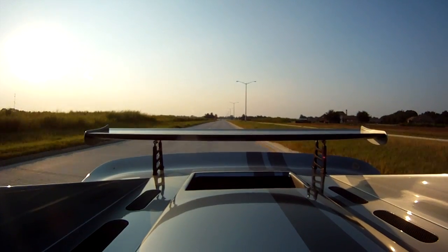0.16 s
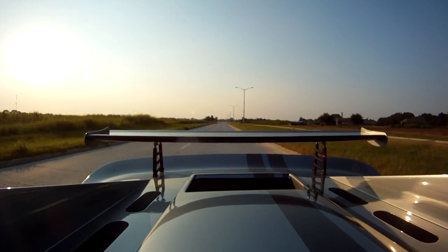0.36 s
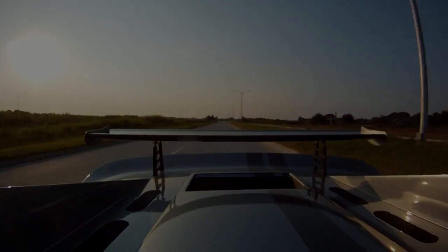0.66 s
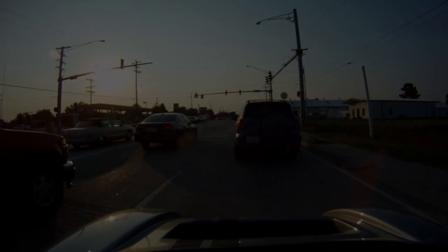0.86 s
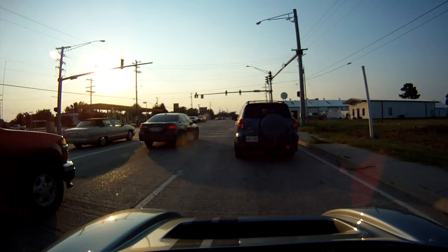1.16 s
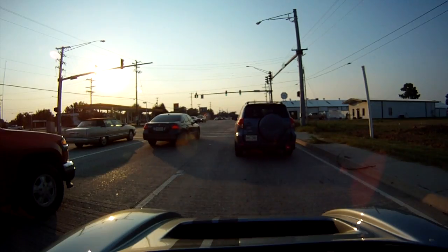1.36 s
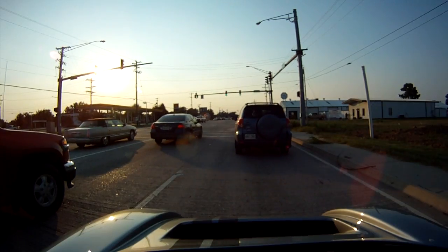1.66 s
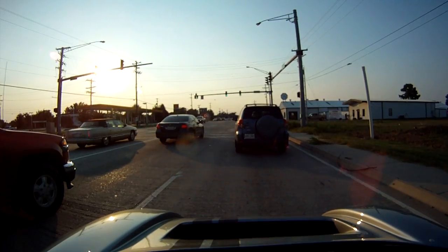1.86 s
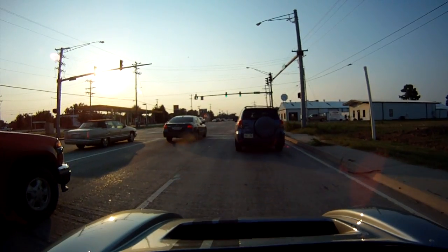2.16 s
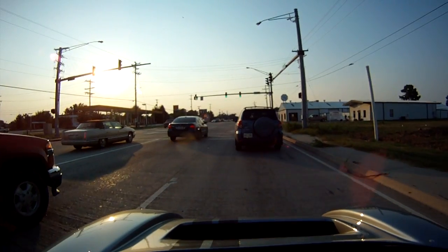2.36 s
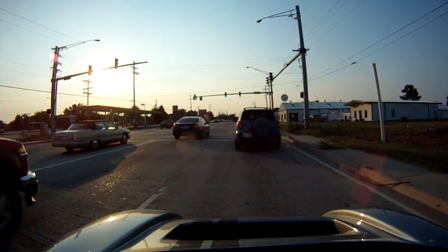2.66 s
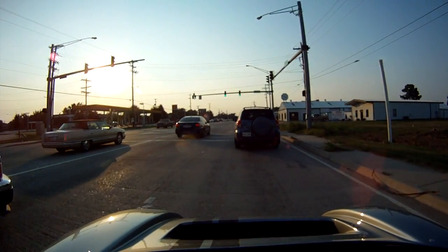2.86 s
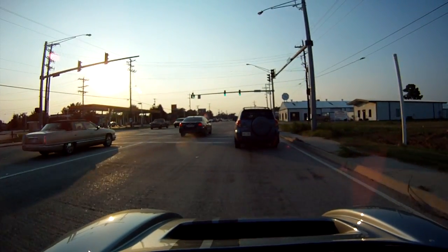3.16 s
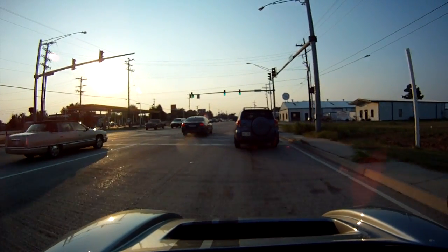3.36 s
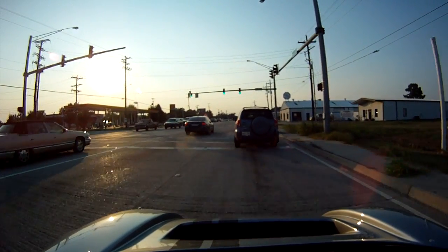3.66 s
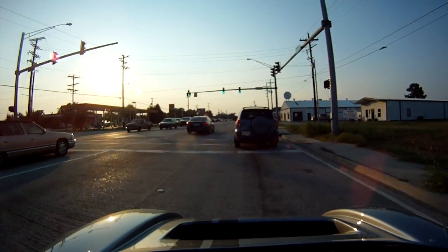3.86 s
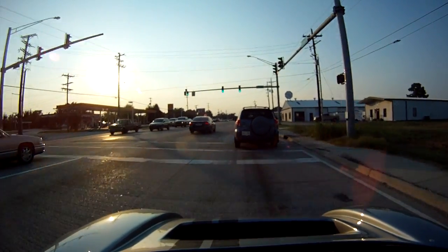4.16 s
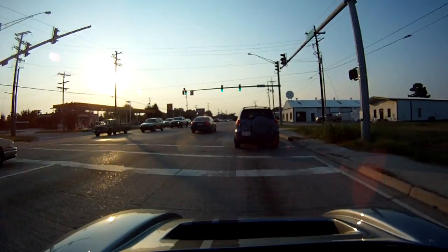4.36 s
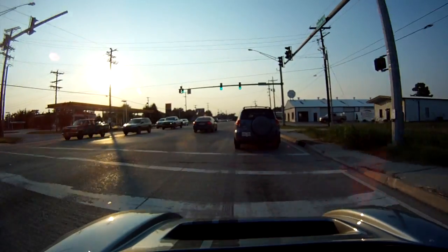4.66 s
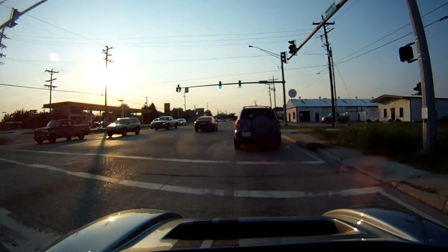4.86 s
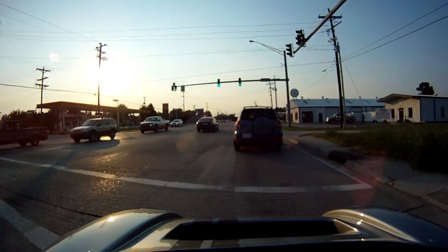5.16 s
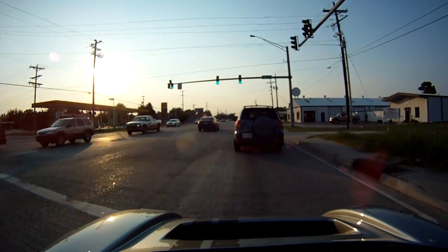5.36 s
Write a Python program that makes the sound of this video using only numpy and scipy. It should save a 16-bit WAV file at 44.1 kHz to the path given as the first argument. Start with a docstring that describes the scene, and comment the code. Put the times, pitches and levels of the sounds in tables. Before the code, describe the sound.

A roaring highway drive heard outside the car, then a sudden cut to soft idling at a junction, revving up and driving off.

```python
"""A roar of wind with slaps and a fast engine: a car cruises with a small housed camera on its tail.
After a hard cut the camera is on the nose: the car idles at a crossing, blips the throttle and pulls away.
The engine is sines on crank orders (cycles per crank turn), coloured by the panel and the bodywork.
Wind, slaps, hiss and tyres are shaped noise; bumps and gusts are short sine booms.
A chain of filters is the housing; the camera samples slowly and holds each sample."""
import sys
import numpy as np
from scipy import signal
from scipy.fft import rfft, irfft
from scipy.io import wavfile

SR = 44100
rng = np.random.default_rng(int(sys.argv[2]) if len(sys.argv) > 2 else 0)


def dump_mix(stems):
    """Bounce the given channels to the path in sys.argv[1] as a 16-bit WAV at rate SR."""
    frames = np.atleast_2d(stems).T  # one column per channel
    limited = np.clip(frames, -1, 1)  # hard clip at full scale
    pcm = np.round(limited * 32767).astype(np.int16)
    wavfile.write(sys.argv[1], SR, pcm)


N = 243431   # length in samples

# All levels are set ahead of the housing and the camera. Noise colours set only the balance of pitches.
CUT_S = .8275   # cruise ends, crossing begins

# Colour of the wind rush while cruising: pitch_hz, level_db (per Hz)
WIND = [(240, -34), (400, -10), (748, -11), (1050, -6), (1660, -7), (2190, -3.5), (5190, -18),
        (5800, -20.5), (7540, -38), (12800, -120)]
# Colour of the air rush at the crossing: pitch_hz, level_db (per Hz)
STREET = [(240, -1), (400, 1), (640, -3), (1010, -4.5), (1660, -11), (2170, 1.5), (3170, -5), (5800, -36.5),
          (7540, -61), (12800, -120)]
# Colour of the low wind buffeting while cruising: pitch_hz, level_db (per Hz)
BUFFET = [(12, -36), (20, 6.5), (54, -3.5), (125, -1), (231, -1.5), (290, -8), (600, -24.5), (780, -20),
          (1320, -120)]
# Colour of the low road rumble at the crossing: pitch_hz, level_db (per Hz)
ROAD = [(12, -47), (20, -0.5), (114, -0.5), (141, -13.5), (192, -17.5), (312, -20), (365, -21),
        (600, -35.5), (780, -30), (1320, -120)]
# Rush of air after the cut, a stand-in for road speed: time_s, level_db
AIR_RUSH = [(0.84, -56), (1.14, -54.5), (1.4, -57.5), (1.88, -49.5), (2.57, -52), (2.95, -48),
            (4.17, -42.5), (4.3, -44), (4.4, -41), (5.15, -41), (5.52, -38)]
# Moments when the rush puffs up or drops: centre_s, change_db, length_s (centre to 1/e)
GUSTS = [(0, 0.5, 0.021), (0.136, 1.5, 0.034), (0.346, -2, 0.035), (0.443, 1, .04), (5.241, 6, 0.032),
         (5.28, -8, 0.0079), (5.323, 5.5, 0.011), (5.52, 3.5, .04)]
CRUISE_RUSH_DB, CRUISE_BUFFET_DB, CRUISE_SHAKE_DB = -17, -18.5, -30

STANDING_DB = -54   # rush of the standing car
# After the cut: level at standing rush (dB), and dB added for each dB the rush grows
RUMBLE_DB, RUMBLE_FOLLOWS = -37, 0.45
SHAKE_DB, SHAKE_FOLLOWS = -40, 0.78
BAY_DB, BAY_FOLLOWS = -59, 0.62

CRUISE_HZ, CRUISE_LOAD_DB = 177.15, 6   # sixth crank order and engine load while cruising
TAIL_FIRING_DB = 9.5   # on the tail the exhaust lifts the sixth order
# Engine at the crossing, sixth crank order: time_s, pitch_hz, load_db
ENGINE = [(.82, 119, -18), (1.5, 120.1, -24), (1.65, 124.1, -12), (1.78, 138, 0.5), (1.95, 161.7, 0),
          (2.1, 178, 0.5), (2.2, 177.6, 2.5), (2.35, 170, -4), (2.55, 143, -7.5), (2.68, 127, 2.5),
          (2.88, 107, 2.5), (2.97, 117, 9), (3.05, 132, 1), (3.2, 137, 1), (3.33, 156, -0.5),
          (3.5, 165, -2.5), (3.75, 188.7, 0.5), (4.1, 215, -2.5), (4.42, 236, -7), (4.76, 251.4, -0.5),
          (5.1, 273, 6.5), (5.52, 292.7, -8)]
# Crank orders: order (cycles per turn), panel_db, body_db (into the body modes), follows (share of load)
ORDERS = [(1.5, -53, -31, 0.84), (2, -42, -28.5, 0.63), (2.5, -62, -36, 0.66), (3, -40, -20.5, 0.94),
          (4, -51, -33, 0.5), (4.5, -66, -35, 1), (5, -60, -42, 1.3), (6, -36, -38, 0.11),
          (7.5, -46.5, -59, 0.91), (8, -53, -33, 0.24), (9, -45, -48, 0.86), (10.5, -53.5, -41.5, 0.17),
          (12, -54.5, -42.5, 0.26), (14, -50.5, -49.5, 0.24), (15, -52, -58, 1.2), (17, -60, -53, 0.66),
          (18, -61, -52, 0.45), (19, -58, -58, 0.42)]
# How the panel passes the crank orders: pitch_hz, level_db
PANEL = [(20, -12), (45, -7), (88, 0), (120, 2), (150, 0), (178, -0.5), (205, -11), (222, -8), (245, -7),
         (268, -4.5), (288, 2.5), (310, -0.5), (338, 1.5), (365, -9.5), (420, -7.5), (510, -5.5),
         (560, -15), (800, -62)]
# Modes of the bodywork, the pitches where it rings: pitch_hz, width_hz, level_db
BODY = [(66, 9.5, -2), (119.94, 6.8, 1), (239.5, 20.2, -2.5), (312.6, 15, -8), (496.4, 37, -8)]
ROAD_SHAKE_HZ = 39.8   # the road shakes less above this
# Booms of the bodywork over bumps and in gusts: centre_s, pitch_hz, level_db (rms), length_s (centre to 1/e)
BOOMS = [(.07, 238, -22, 0.042), (0.283, 237, -21, 0.055), (0.167, 60.5, -19, 0.068),
         (0.5, 102, -20, 0.052), (0.575, 98, -19.5, 0.061), (0.74, 60, -21, 0.075), (0.787, 101, -27, 0.02),
         (1.1, 75, -57, 0.11), (1.715, 118, -39, 0.044), (2.466, 113, -32, 0.09),
         (2.772, 116, -31.5, 0.076), (3.304, 112, -27.5, 0.18), (3.59, 103, -28.5, 0.053),
         (3.803, 71, -21.5, 0.06), (4.146, 65, -20, 0.044), (4.38, 66, -29.5, 0.14),
         (4.624, 71, -28, 0.088), (4.83, 61, -28, 0.063), (5.09, 62, -26, 0.14), (5.22, 107, -33, 0.046),
         (5.414, 66, -20, 0.067)]

# Wind slaps on the housing: start_s, level_db (at the peak), rise_ms (start to peak)
SLAPS = [(0.043, -16.5, 4.1), (0.1587, -15, 6.7), (0.298, -9.5, 3.6), (0.458, -15, 4.9), (0.5748, -7, 1.5),
         (0.602, -19, 3.7)]
# Colour of a slap: pitch_hz, level_db (per Hz)
THUD = [(500, -14), (2300, 0.5), (4500, -12)]

# Steady tone that dies as the car moves off: time_s, pitch_hz, level_db
IDLE_TONE = [(.82, 340, -72), (.84, 323.6, -52.5), (1.5, 316.7, -54.5), (2.0, 302.3, -50),
             (2.4, 320.4, -62), (2.8, 318, -49), (3.2, 316.6, -72)]
# Colour of the engine bay hiss: pitch_hz, level_db (per Hz)
BAY = [(400, -20), (800, 1), (2000, -12.5), (3000, 2.5), (4000, 1.5), (5000, -3.5), (6500, -10)]
# Swells of the engine bay hiss: centre_s, change_db, length_s (centre to 1/e)
SWELLS = [(0.837, 8.5, 0.076), (1.114, 8, 0.083), (1.69, 5.5, 0.044), (2.333, 5, 0.17), (2.947, 5.5, 0.11),
          (3.567, 5.5, .08), (5.5, 0, .05)]
# Tyre roar after the cut: time_s, level_db
TYRES = [(.84, -68), (2.6, -76), (3.2, -62), (3.8, -57), (4.8, -47.5), (5.52, -46.5)]
# Colour of the tyre roar: pitch_hz, level_db (per Hz)
TREAD = [(550, -26), (750, -1), (1100, 5.5), (1500, -8.5), (2000, -32)]
# Hum that rises more slowly than the engine: time_s, pitch_hz, level_db
RISING_HUM = [(3.3, 116.4, -71), (3.6, 125.5, -44), (4.0, 137, -36), (4.5, 148, -40), (5.1, 160.8, -38),
              (5.52, 172, -37.5)]

# Peaks and dips of the housing on the tail: pitch_hz, width_hz, level_db
TAIL_MOUNT = [(1054, 146, 8), (1303, 58, -7), (1470, 220, 5.5), (1600, 95, -6), (2273, 220, 7.5),
              (2790, 270, 3.5), (3990, 160, 4), (4340, 470, -4.5), (4710, 170, 6.5), (5216, 100, 7)]
# Peaks and dips of the housing on the nose: pitch_hz, width_hz, level_db
NOSE_MOUNT = [(754, 30, 2.5), (997, 41, 7), (1260, 84, -3.5), (1437, 180, 8.5), (1655, 150, -3),
              (2138, 50, 7.5), (2450, 57, -10.5), (2790, 117, 6.5), (3145, 300, -10), (3580, 410, -7.5),
              (3994, 76, 4), (4360, 480, -8.5), (4620, 150, 0.5)]
ALIAS_GUARD_HZ, CUTOFF_HZ = 5710, 15200   # treble limits before sampling and at the output


def from_db(db):
    """Turn decibels into gain."""
    return 10 ** (np.asarray(db) / 20)


def rms_one(x):
    """Scale a sound to an rms level of 1."""
    return x / np.sqrt(np.mean(x ** 2) + 1e-20)


def in_time(rows):
    """Draw straight lines between the rows of a table, one curve for each column after the time."""
    times_s, *columns = np.transpose(rows)
    return np.array([np.interp(np.arange(N) / SR, times_s, column) for column in columns])


def cut(cruise, street):
    """Take the cruise before the cut and the crossing after it."""
    return np.where(np.arange(N) / SR < CUT_S, cruise, street)


def at_hz(points, hz):
    """Read a colour at any pitch, along a log pitch axis."""
    point_hz, point_db = np.array(points).T
    return np.interp(np.log(hz), np.log(point_hz), point_db)


def bell(centre_s, length_s):
    """A smooth rise and fall round a moment."""
    return np.exp(-((np.arange(N) / SR - centre_s) / length_s) ** 2)


def drift(rate_hz):
    """A slow random wander of rms 1, made by smoothing noise at one point per 40 samples."""
    r = np.exp(-80 * np.pi * rate_hz / SR)
    noise = rng.standard_normal(N // 40 + 2002)
    slow = signal.lfilter([1], [1, -2 * r, r * r], noise)[2000:]   # drop the filter's start
    return np.interp(np.arange(N) / 40, np.arange(len(slow)), rms_one(slow))


def turbulence(spectrum, gust_db, own_db, gust_hz):
    """Coloured noise of rms 1 in octave bands, which gust together and also flicker on their own."""
    hz = np.fft.rfftfreq(N, 1 / SR) + 1e-3   # keeps the logarithm off zero
    coloured = rfft(rng.standard_normal(N)) * from_db(at_hz(spectrum, hz))
    coloured[(hz < spectrum[0][0]) | (hz > spectrum[-1][0])] = 0
    out = np.zeros(N)
    shared_gust_db = gust_db * drift(gust_hz)
    for centre_hz in 23 * 2. ** np.arange(9):
        octaves_away = np.clip(np.log2(hz / centre_hz), -1, 1)
        window = np.cos(np.pi / 2 * octaves_away) ** 2   # neighbouring windows sum to one
        if np.any(window * np.abs(coloured) > 1e-9):
            band = irfft(coloured * window, N)
            out += band * from_db(shared_gust_db + own_db * drift(gust_hz))
    return rms_one(out)


def tone(hz, db, waver_db):
    """A sine that follows a moving pitch and rms level, with a random waver in level."""
    phase = 2 * np.pi * (np.cumsum(hz) / SR + rng.random())
    return np.sqrt(2) * from_db(db + waver_db * drift(5)) * np.sin(phase)


def rush_growth_db():
    """How far the rush of air has grown over that of the standing car."""
    return in_time(AIR_RUSH)[0] - STANDING_DB


def body_power(hz):
    """Bodywork modes pass most power when a pitch meets their own."""
    power = 0
    for mode_hz, width_hz, db in BODY:
        distance = 2 * (hz - mode_hz) / width_hz
        power = power + (from_db(db) / (1 + distance ** 2)) ** 2
    return power


def air():
    """Moving air is noise: a rush above, with wind buffeting and then road rumble below."""
    gust_db = sum(db * bell(centre_s, length_s) for centre_s, db, length_s in GUSTS)
    wind = turbulence(WIND, gust_db=1.27, own_db=0.35, gust_hz=36.5)
    street = turbulence(STREET, gust_db=0.62, own_db=0.86, gust_hz=29.4)
    rush = cut(from_db(CRUISE_RUSH_DB + gust_db) * wind,
               from_db(in_time(AIR_RUSH)[0] + gust_db) * street)
    buffet = turbulence(BUFFET, gust_db=1.5, own_db=2.5, gust_hz=13.0)
    road = turbulence(ROAD, gust_db=2.5, own_db=1.9, gust_hz=5.7)
    rumble = cut(from_db(CRUISE_BUFFET_DB) * buffet,
                 from_db(RUMBLE_DB + RUMBLE_FOLLOWS * rush_growth_db()) * road)
    return rush + rumble


def engine():
    """Sines on the crank orders come through the panel and swell where they sweep through a body mode."""
    street_hz, street_load_db = in_time(ENGINE)
    wander = 1 + cut(.012, .003) * drift(8)   # the crank never turns quite evenly
    crank_hz = cut(CRUISE_HZ, street_hz) / 6 * wander
    load_db = cut(CRUISE_LOAD_DB, street_load_db)
    out = np.zeros(N)
    for order, panel_db, body_db, follows in ORDERS:
        hz = order * crank_hz
        panel_gain = from_db(panel_db + at_hz(PANEL, hz))
        body_gain_squared = from_db(body_db) ** 2 * body_power(hz)
        gain = np.sqrt(panel_gain ** 2 + body_gain_squared)
        firing_db = cut(TAIL_FIRING_DB * (order == 6), 0)
        out += gain * tone(hz, follows * load_db + firing_db, waver_db=cut(3.5, .8))
    return out


def body():
    """The road shakes the body modes at random, and bumps and gusts make the bodywork boom."""
    noise_hz = np.fft.rfftfreq(N, 1 / SR)
    ringing = np.sqrt(body_power(noise_hz)) / (1 + (noise_hz / ROAD_SHAKE_HZ) ** 2)
    shaking = rms_one(irfft(rfft(rng.standard_normal(N)) * ringing, N))
    out = shaking * from_db(cut(CRUISE_SHAKE_DB, SHAKE_DB + SHAKE_FOLLOWS * rush_growth_db()))
    for centre_s, hz, db, length_s in BOOMS:
        wave = np.sin(2 * np.pi * (hz * np.arange(N) / SR + rng.random()))
        out += np.sqrt(2) * from_db(db) * bell(centre_s, length_s) * wave
    return out


def slaps():
    """Wind slapping the housing gives short bursts of turbulence."""
    t = np.arange(N) / SR
    shape = np.zeros(N)
    for start_s, db, rise_ms in SLAPS:
        from_peak = 1000 * (t - start_s) / rise_ms - 1
        shape += from_db(db) * np.exp(-4 * from_peak ** 2)
    return shape * turbulence(THUD, gust_db=1, own_db=2.5, gust_hz=30)


def idle_tone():
    """A sine whose pitch does not follow the crank, fading as the car moves off."""
    return tone(*in_time(IDLE_TONE), waver_db=0.0)


def engine_bay():
    """Valve gear and fan hiss as flickering noise after the cut, swelling at set moments."""
    swell_db = sum(db * bell(centre_s, length_s) for centre_s, db, length_s in SWELLS)
    level_db = BAY_DB + BAY_FOLLOWS * rush_growth_db() + swell_db
    return cut(0, from_db(level_db) * turbulence(BAY, gust_db=0.3, own_db=1.7, gust_hz=40))


def tyres():
    """Tread on coarse asphalt roars near one kilohertz after the cut."""
    roar = turbulence(TREAD, gust_db=-1.0, own_db=-0.3, gust_hz=25)
    return cut(0, from_db(in_time(TYRES)[0]) * roar)


def rising_hum():
    """A sine that climbs more slowly than the engine as the car pulls away."""
    return tone(*in_time(RISING_HUM), waver_db=-1.0)


def housing(x, modes):
    """The housing favours some pitches and weakens others: a chain of peak and dip filters."""
    for hz, width_hz, db in modes:
        a = from_db(db / 2)
        w = 2 * np.pi * hz / SR
        q = np.pi * width_hz / SR
        top = [1 + q * a, -2 * np.cos(w), 1 - q * a]
        bottom = [1 + q / a, -2 * np.cos(w), 1 - q / a]
        x = signal.lfilter(top, bottom, x)
    return x


def scene():
    """Add all the sounds and pass them through the housing, on the tail and then on the nose."""
    outside = air() + engine() + body() + slaps() + idle_tone() + engine_bay() + tyres() + rising_hum()
    on_tail = housing(outside, TAIL_MOUNT)
    on_nose = housing(cut(0, outside), NOSE_MOUNT)   # no ringing carried over from the cruise
    return cut(on_tail, on_nose)[None]


def record(dry):
    """The camera samples at 12 kHz and holds each sample, which adds mirror images round 12 kHz."""
    alias_guard = signal.cheby1(6, 1, ALIAS_GUARD_HZ, fs=SR, output="sos")
    x = signal.sosfilt(alias_guard, dry[0])
    bass_cut = signal.butter(3, 36, "high", fs=SR, output="sos")   # the microphone loses the lowest bass
    x = signal.sosfilt(bass_cut, x)
    sampled = signal.resample_poly(x, 40, 147)   # 44.1 to 12 kHz
    held = np.repeat(sampled, 8)                 # 96 kHz steps
    x = signal.resample_poly(held, 147, 320)[:N]   # back to 44.1 kHz
    x = 1.5 * np.tanh(x / 1.5)   # soft peaks
    top_cut = signal.ellip(12, .5, 70, CUTOFF_HZ, fs=SR, output="sos")
    return signal.sosfilt(top_cut, x)[None]


dry = scene()
out = record(dry)
dump_mix(out)
```